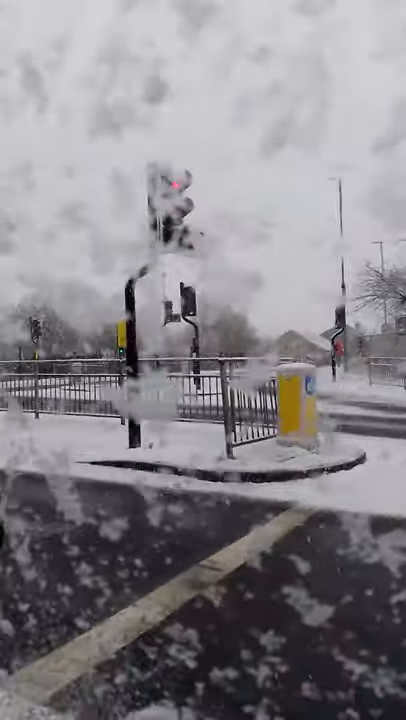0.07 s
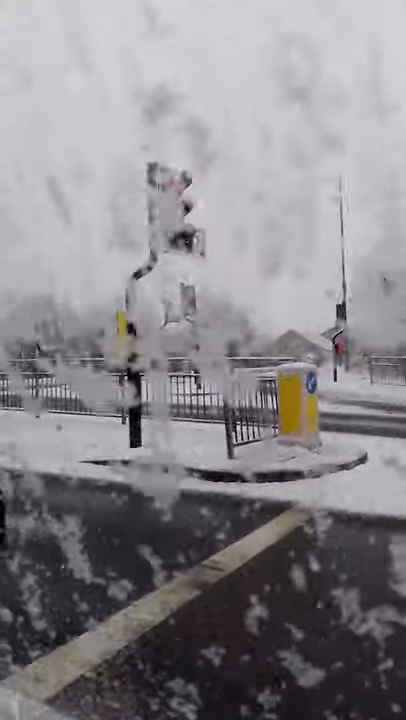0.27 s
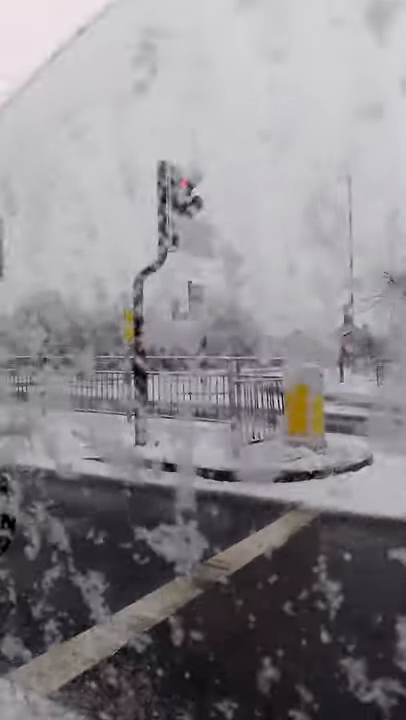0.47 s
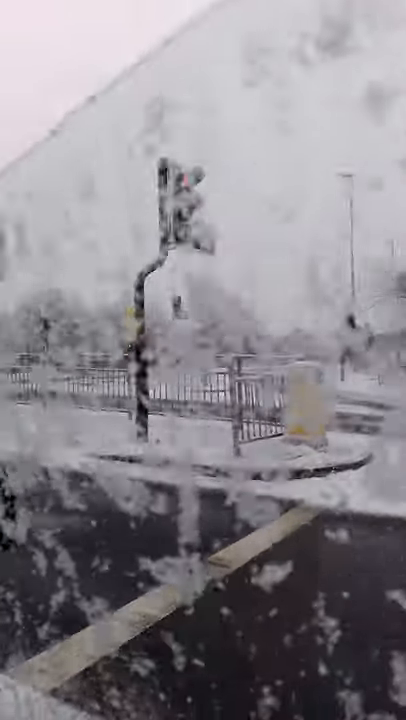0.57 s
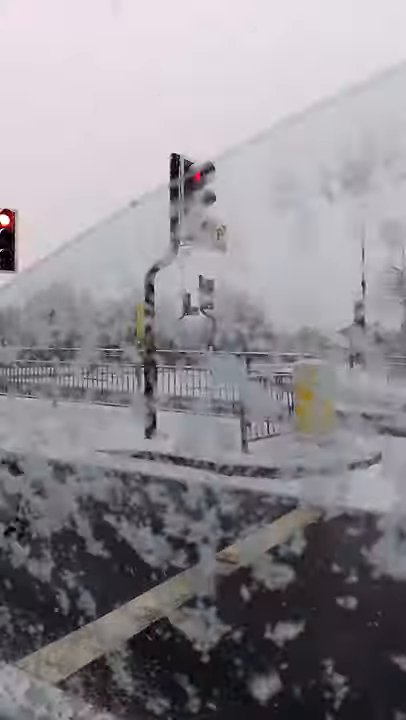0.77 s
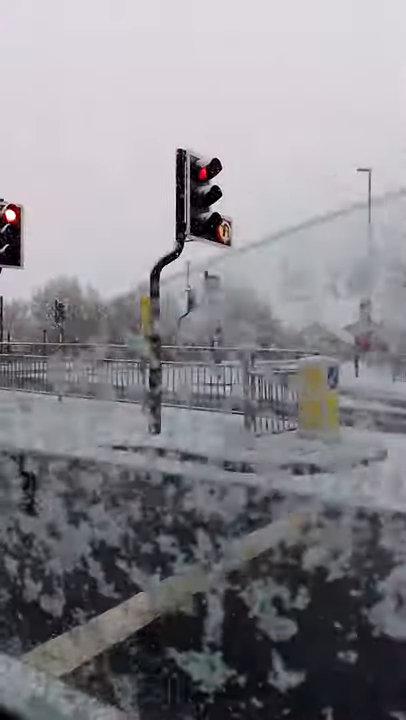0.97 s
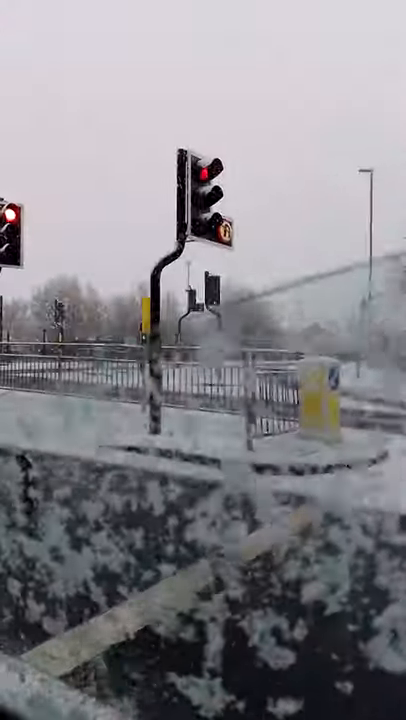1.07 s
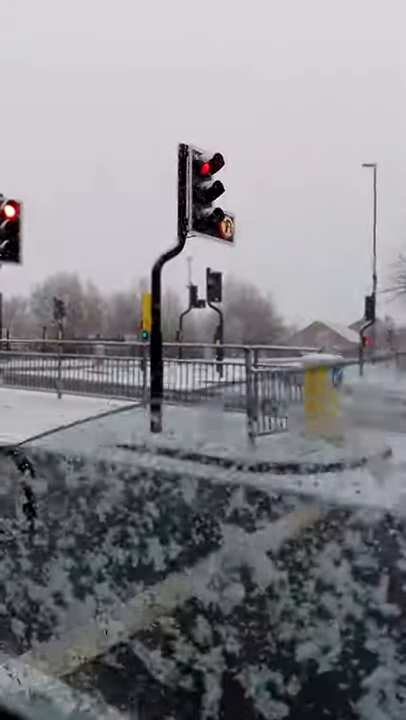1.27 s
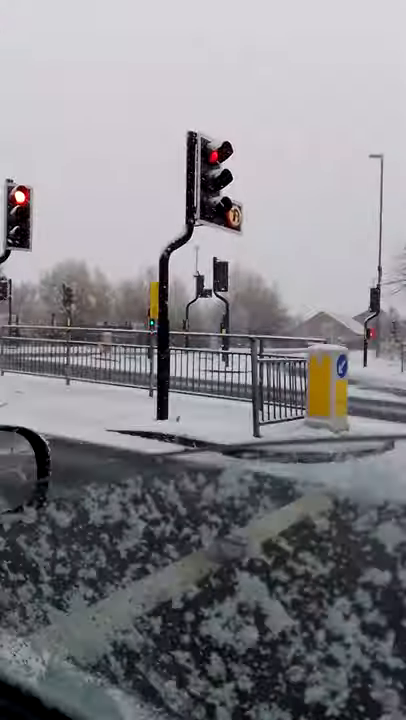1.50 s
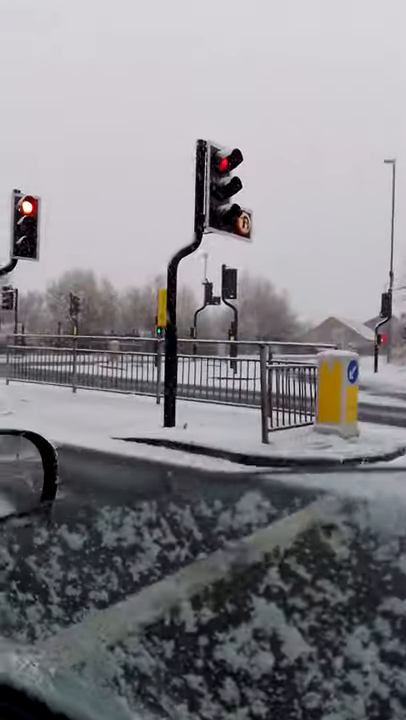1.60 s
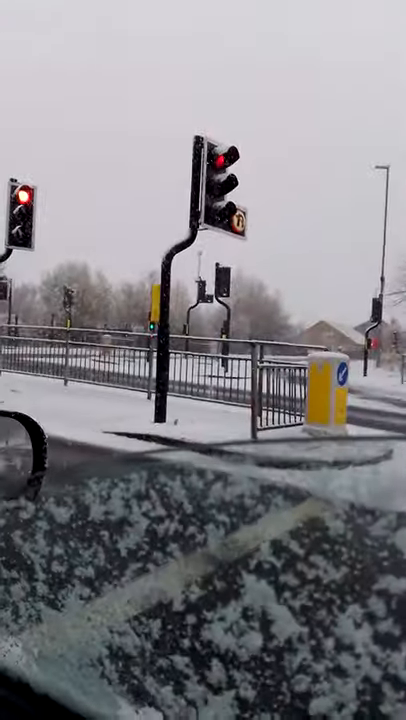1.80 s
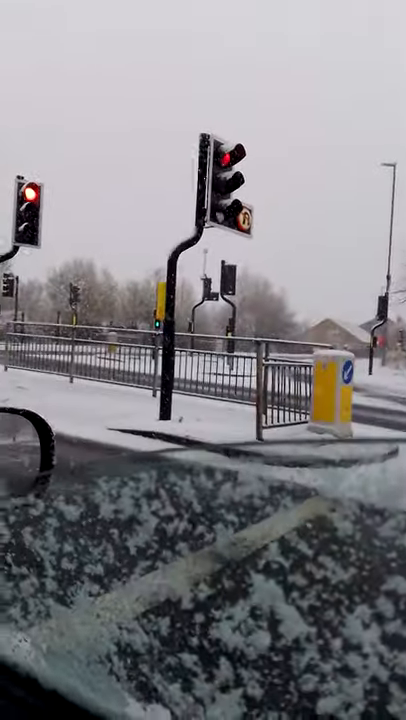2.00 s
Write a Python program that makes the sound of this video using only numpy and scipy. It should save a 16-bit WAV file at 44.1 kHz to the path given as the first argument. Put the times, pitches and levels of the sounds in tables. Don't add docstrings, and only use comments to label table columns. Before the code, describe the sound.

A car's electric window motor buzzes as wet glass hisses through rubber seals, then clicks off

```python
import sys
import numpy as np
from scipy import signal
from scipy.fft import rfft, irfft
from scipy.io import wavfile
from scipy.ndimage import map_coordinates

SR = 44100
rng = np.random.default_rng(int(sys.argv[2]) if len(sys.argv) > 2 else 0)


def master(y):
    cut = np.clip(np.atleast_2d(y).T, -1, 1)
    pcm = np.round(cut * 32767)
    wavfile.write(sys.argv[1], SR, pcm.astype(np.int16))


def linear_from_db(decibels):
    return 10 ** (np.asarray(decibels, float) / 20)


N = 90404
T = np.arange(N) / SR
CUTOFF_HZ = 15950
FADE_S = 0.04


def rms_one(x):
    return x / np.sqrt(np.mean(x ** 2) + 1e-20)


def in_time(rows):
    s, *columns = np.transpose(rows)
    return [np.interp(T, s, c) for c in columns]


def gate(start, end, fade_s):
    return np.clip(np.minimum(T - start, end - T) / fade_s, 0, 1)


def drift(rate):
    step, settle = 40, 2000
    r = np.exp(-2 * np.pi * rate * step / SR)
    noise = rng.standard_normal(N // step + settle + 2)
    slow = rms_one(signal.lfilter([1], [1, -2 * r, r * r], noise)[settle:])
    return np.interp(np.arange(N) / step, np.arange(len(slow)), slow)


def resonances(x, table, patchy_db=0):
    out = 0
    for k, (hz, width, db) in enumerate(table):
        r = np.exp(-np.pi * width / SR)
        poles = [1, -2 * r * np.cos(2 * np.pi * hz / SR), r * r]
        rung = signal.lfilter([1, 0, -1], poles, x + 1e-18) * np.sqrt(1 - r * r) / 2
        swell = patchy_db * drift(9.8) if patchy_db else 0
        out = out + (-1) ** k * rung * linear_from_db(db + swell)
    return out


def colour(x, spectrum, patchy_db, rate):
    hz = np.maximum(np.arange(N // 2 + 1) * SR / N, 1)
    points_hz, points_db = np.array(spectrum).T
    shaped = rfft(x) * linear_from_db(np.interp(np.log(hz), np.log(points_hz), points_db))
    shaped = shaped * (hz < CUTOFF_HZ) * np.minimum(1, hz / points_hz[0]) ** 3
    place = 3 * np.log2(np.clip(hz, 60, 16000) / 60)
    first = max(0, int(3 * np.log2(points_hz[0] / 240)))
    out = 0
    for k in range(first, int(place.max()) + 2):
        band = irfft(shaped * np.maximum(0, 1 - abs(place - k)), N)
        out = out + band * linear_from_db(patchy_db * drift(rate))
    return rms_one(out)


def bursts(rows, rise_s):
    s, db, t60, *weights = np.array(rows).T[:, :, None]
    rise = np.clip((T - s) / rise_s, 0, 1)
    shape = rise * linear_from_db(db - 60 * np.maximum(T - s - rise_s, 0) / t60)
    return [rng.standard_normal(N) * (shape * linear_from_db(w)).sum(axis=0) for w in [0, *weights]]


def cabin():
    # f/Hz, level/dB per Hz
    spectrum = [(30, -17), (100, 1.5), (165, -9.5), (264, 2), (1000, -6), (1900, -20.5), (8800, -29),
                (15700, -16.5)]
    return linear_from_db(-65.5) * colour(rng.standard_normal(N), spectrum, patchy_db=-1.5, rate=18.0)


def seals():
    # t/s, hiss level/dB, pane ringing against the hiss/dB
    slide = [(.115, -77.5, -21), (.15, -42.5, 1.5), (.165, -39, -16), (.2, -39.5, -4.5), (.235, -45, -41),
             (.26, -41, -12.5), (.275, -32, -10), (.31, -36.5, -9.5), (.36, -39, -13), (.6, -38, -13),
             (1.03, -39, -13), (1.07, -41, -16.5), (1.12, -40, -15.5), (1.58, -41, -23), (1.7, -53, -14.5),
             (1.79, -60.5, -9.5), (1.87, -73, -42), (2.05, -79.5, -3)]
    # f/Hz, level/dB per Hz
    seal_spectrum = [(5000, -52), (6000, -19.5), (6630, -11.5), (8390, -1), (9680, -5.5), (10500, -22),
                     (12000, -33), (15700, -32)]
    # f/Hz, level/dB per Hz
    pane_spectrum = [(2500, -9), (3100, -4), (3800, -3), (4500, -3), (4900, -10.5), (5300, -4),
                     (5800, -4.5), (6500, -20.5)]
    # f/Hz, width/Hz, level/dB
    pane_modes = [(3530, 71, -15), (3750, 82, -14.5), (4816, 105, -10), (5500, 40, -38)]
    grains_per_s, grain_share, grain_spread_db = 3000, 0.32, 4
    db, pane_db = in_time(slide)
    sizes = linear_from_db(grain_spread_db * np.minimum(rng.exponential(1, N), 5)) * rng.choice([-1, 1], N)
    grains = rms_one(sizes * (rng.random(N) < grains_per_s / SR))
    rub = grain_share * grains + rng.standard_normal(N)
    pane = colour(rub, pane_spectrum, patchy_db=2.0, rate=8.0)
    pane = pane + resonances(rng.standard_normal(N), pane_modes, patchy_db=1.0)
    hiss = colour(rub, seal_spectrum, patchy_db=0.6, rate=10)
    return linear_from_db(db + 0.48 * drift(16.5)) * (hiss + linear_from_db(pane_db) * pane)


def reflections(x, count=6):
    shortest_s, longest_s, glide_s, echo_db = 0.000978, 0.009, 2.5e-5, -12
    echoes = 0
    for k, lag in enumerate(rng.uniform(shortest_s, longest_s, count)):
        creeping = lag + glide_s * drift(1.0)
        echoes = echoes + (-1) ** k * map_coordinates(x, [np.arange(N) - creeping * SR], order=2)
    return (x + linear_from_db(echo_db) * echoes) / np.sqrt(1 + count * linear_from_db(2 * echo_db))


def switch():
    # t/s, level/dB, t60/s, housing/dB, top edge/dB
    clicks = [(.117, -48, 0.15, -9, -15), (.126, -23, 0.0067, -30, -20), (.128, -46, 0.074, -18, -1),
              (.156, -36.5, 0.072, -12, -9), (1.7695, -42, 0.025, -1.5, -16),
              (1.772, -35, 0.0088, -12.5, 4.5), (1.7733, -38.5, 0.008, -16, 2),
              (1.775, -48, 0.048, -4.5, -1), (1.7805, -45, 0.01, -12, -10), (1.788, -51, .012, -18, -9),
              (1.946, -64, 0.03, -4.5, -1)]
    # f/Hz, width/Hz, level/dB
    crack_modes = [(9230, 800, 2), (4000, 2000, -8.5), (11500, 900, -11)]
    # f/Hz, width/Hz, level/dB
    body_modes = [(1180, 130, -1.5), (1525, 190, -2), (1960, 120, -6.5), (650, 120, -9), (4180, 1300, -3)]
    # f/Hz, width/Hz, level/dB
    edge_modes = [(11070, 460, -7.5), (12760, 1400, -6), (14200, 820, -2), (15400, 1100, -8)]
    crack, body, edge = bursts(clicks, rise_s=0.0009)
    snap = resonances(crack, crack_modes) + resonances(body, body_modes) + resonances(edge, edge_modes)
    return signal.sosfilt(signal.cheby2(14, 60, 17000, fs=SR, output="sos"), snap)


def motor():
    # t/s, commutator f/Hz, effort/dB, tone/dB
    run = [(.12, 200, -97, -101), (.15, 260, -43.5, -52), (.26, 300, -53, -56), (.4, 345.6, -51, -50.5),
           (.46, 360, -55.5, -61), (.5, 600, -54, -62), (.82, 589.6, -55, -63), (.9, 560, -52.5, -61),
           (1.07, 540, -57, -55), (1.1, 495, -52.5, -58), (1.28, 512, -53, -55.5), (1.4, 430, -53, -65.5),
           (1.53, 423, -57, -103), (1.6, 400, -65.5, -69), (1.8, 350, -62.5, -84), (1.85, 350, -100, -110)]
    # f/Hz, level/dB per Hz
    door_spectrum = [(60, -36), (110, -6.5), (165, -18), (240, -6.5), (400, -19), (700, -7.5),
                     (2350, -15.5), (2900, -19)]
    # f/Hz, width/Hz, level/dB
    panels = [(230, 27, -19.5), (312, 120, -13), (536.5, 35, -8.5), (1808, 110, -11)]
    wobble_hz, throb_depth, octave_db = 18, 0.64, -22
    hz, effort_db, tone_db = in_time(run)
    phase = 2 * np.pi * np.cumsum(hz + wobble_hz * drift(41.8)) / SR
    brush = rng.standard_normal((2, N)) * (1 + throb_depth * np.sin(phase))
    door = colour(brush[0], door_spectrum, patchy_db=1.0, rate=13.2)
    door = door + resonances(brush[1], panels, patchy_db=2.0)
    tone = np.sin(phase) * linear_from_db(3.5 * drift(22.0))
    octave = np.sin(2 * phase) * linear_from_db(octave_db + 1.7 * drift(2.0))
    return linear_from_db(effort_db) * door + linear_from_db(tone_db) * (tone + octave)


def brushes():
    high = signal.butter(4, 11300, "high", fs=SR, output="sos")
    hiss = signal.sosfilt(high, rng.standard_normal(N))
    return linear_from_db(-64 + 7.5 * T) * hiss * gate(0.12, 1.79, 0.015)


def squeaks():
    # start t/s, end t/s, f/Hz, width/Hz, level/dB
    rows = [(0.17, .55, 11600, 110, -58.5), (.26, 0.64, 11230, 140, -55), (.85, 1.197, 16000, 95, -68),
            (0.82, 1.24, 11330, 120, -60), (1.3, 1.613, 4010, 84, -63), (1.34, 1.57, 3150, 120, -62),
            (1.3, 1.32, 11000, 150, -62), (1.07, 1.5, 3720, 160, -63), (0.398, 0.774, 1200, 34, -60.5),
            (0.73, 1.08, 1150, 130, -60), (0.53, 0.775, 1060, 74, -63.5), (0.65, .86, 855, 66, -61.5),
            (0.863, 1.1, 868, 87, -60), (1.25, 1.4, 866, 83, -61), (1.26, 1.36, 1100, 49, -62),
            (0.66, 1.03, 1480, 150, -64.5), (1.05, 1.3, 480, 120, -58.5), (1.28, 1.43, 424, 70, -63),
            (0.31, 0.47, 512, 71, -58), (0.587, 0.926, 552, 140, -62), (0.61, 0.886, 241, 48, -63.5),
            (0.226, 0.52, 107.4, 40, -61.5), (1.366, 1.55, 116, 52, -68), (.95, 1.76, 8450, 600, -51.5),
            (1.45, 1.74, 5600, 150, -64.5), (0.16, .34, 606, 200, -56), (0.19, 0.285, 880, 240, -54),
            (0.124, 0.23, 930, 410, -51.5)]
    out = 0
    for start, end, hz, width, db in rows:
        mode = [(hz, width, 0)]
        whistle = rms_one(resonances(resonances(rng.standard_normal(N), mode), mode))
        out = out + linear_from_db(db) * whistle * gate(start, end, FADE_S)
    return out


def lift():
    # t/s, low level/dB, t60/s, high part against low/dB
    knocks = [
        (.13, -50, 0.67, 0.5),
        (.188, -36, 0.083, 5.5),
        (.194, -38, 0.071, -4),
        (.21, -49.5, 0.32, -5),
        (.265, -51.5, 0.34, 3),
        (.745, -54.5, 0.092, -10),
        (1.05, -49.5, 0.027, -23),
        (1.785, -58, 0.1, -6),
    ]
    # f/Hz, width/Hz, level/dB
    low_modes = [(237.6, 52, 1.5), (326, 80, 5), (450, 440, 2.5)]
    # f/Hz, width/Hz, level/dB
    high_modes = [(880, 49, -4), (960, 64, -6), (1130, 103, -3.5), (1730, 620, -7), (2270, 570, -9.5)]
    # f/Hz, width/Hz, level/dB
    jolt_modes = [(1060, 200, 5), (1230, 230, 2.5), (1430, 230, 0), (1830, 88, -2)]
    low, high = bursts(knocks, rise_s=0.004)
    jolt, = bursts([(0.486, -47, 0.12)], rise_s=0.025)
    return resonances(low, low_modes) + resonances(high, high_modes) + resonances(jolt, jolt_modes)


def jerks():
    # t/s, level/dB, t60/s
    rows = [
        (.1524, -19, 0.005),
        (.1538, -21, 0.0058),
        (.268, -36, 0.078),
        (.283, -28, 0.011),
        (.303, -34, 0.034),
        (.315, -32, .025),
    ]
    # f/Hz, width/Hz, level/dB
    snap_modes = [(9420, 1370, 2), (7560, 2400, -9), (12600, 5300, -13)]
    snaps, = bursts(rows, rise_s=0.0013)
    return resonances(snaps, snap_modes)


def thud():
    # t/s, level/dB
    blows = [
        (.1905, -29),
        (.1955, -29),
        (0.2, -31.5),
    ]
    # f/Hz, level/dB, t60/s
    door_modes = [(279, -2.5, 0.078), (382, -5.5, 0.064), (560, -13, .04), (882, -6.5, 0.055),
                  (1148, -5.5, 0.045), (1460, -10.5, 0.036), (1787, -15, 0.044)]
    impulses, out = np.full(N, 1e-18), 0
    for s, db in blows:
        impulses[int(s * SR)] = linear_from_db(db)
    for k, (hz, db, t60) in enumerate(door_modes):
        r = linear_from_db(-60 / (t60 * SR))
        poles = [1, -2 * r * np.cos(2 * np.pi * hz / SR), r * r]
        out = out + (-1) ** k * linear_from_db(db) * signal.lfilter([0.5, 0, -0.5], poles, impulses)
    return out


def notch(x, hz, depth, width_hz):
    turn = np.exp(2j * np.pi * np.cumsum(hz) / SR)
    low = signal.butter(2, width_hz, fs=SR, output="sos")
    band = signal.sosfiltfilt(low, x / turn) * turn
    return x - 2 * depth * band.real


def cancellations(x):
    # t/s, f/Hz, depth/0-1
    moving = [(.45, 2600, 0), (.55, 2650, .95), (1.08, 2600, .9), (1.11, 3030, .95), (1.33, 2980, .97),
              (1.36, 2880, .85), (1.47, 2860, .85), (1.49, 2700, .97), (1.65, 2750, .5)]
    # start t/s, end t/s, f/Hz, half width/Hz
    holes = [(.5, 1.45, 700, 45), (.72, 1.4, 1000, 35), (.5, 1.05, 410, 30), (1.18, 1.38, 1430, 50),
             (.52, .83, 1680, 35), (.1, 2.0, 165, 20), (1.05, 1.4, 4500, 90), (1.14, 1.47, 2600, 70),
             (1.42, 1.52, 5100, 110), (.62, .82, 5150, 90), (.11, .29, 5950, 130), (1.44, 1.79, 10050, 380),
             (1.42, 1.79, 5800, 550), (1.03, 1.11, 5300, 900)]
    x = notch(x, *in_time(moving), 110)
    for start, end, hz, width in holes:
        depth = 0.85 if width < 250 else 0.5
        x = notch(x, np.full(N, hz), depth * gate(start, end, FADE_S), width)
    return x


def scene():
    through_door = cancellations(reflections(seals()) + motor() + squeaks() + lift())
    steady = through_door + brushes() + cabin() + jerks() + thud()
    top = signal.cheby2(20, 70, CUTOFF_HZ + 50, fs=SR, output="sos")
    return (signal.sosfilt(top, steady) + switch())[None]


def band_limit(x):
    return signal.sosfilt(signal.butter(12, 16990, fs=SR, output="sos"), x)


def record(dry):
    return band_limit(dry)


dry = scene()
out = record(dry)
master(out)
```